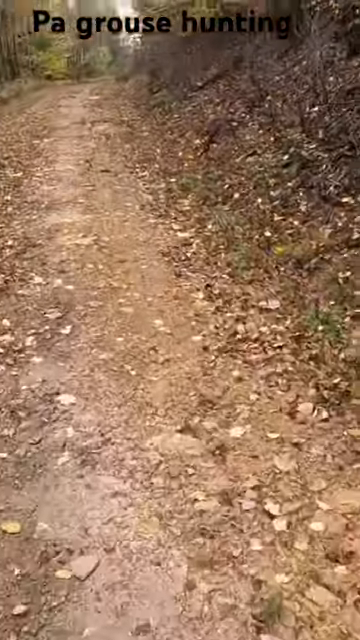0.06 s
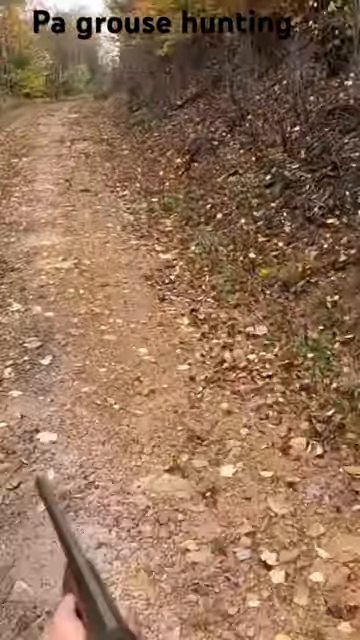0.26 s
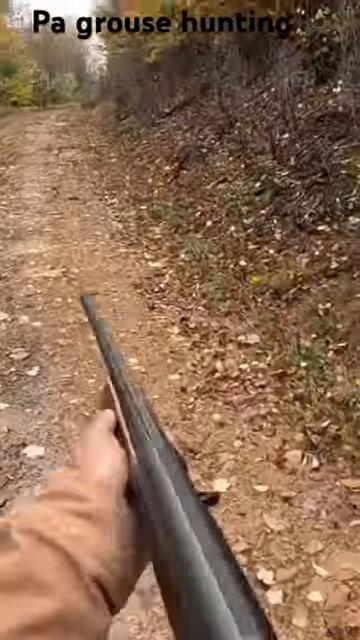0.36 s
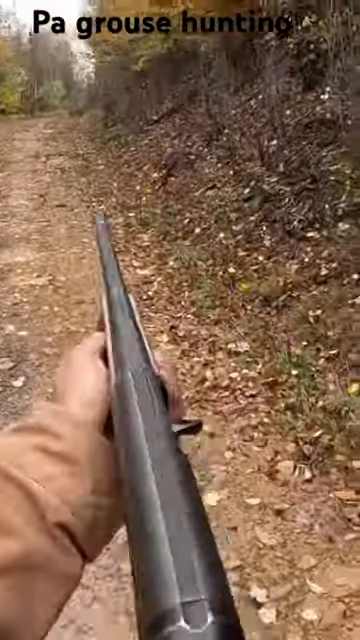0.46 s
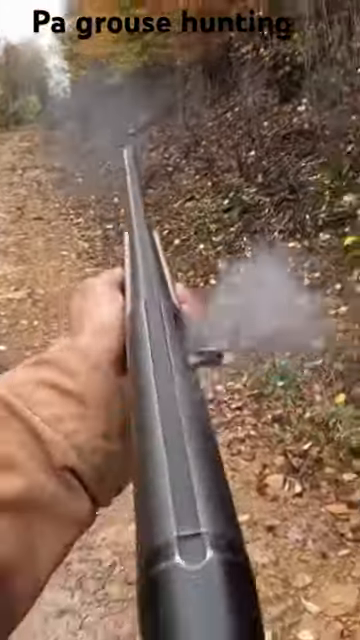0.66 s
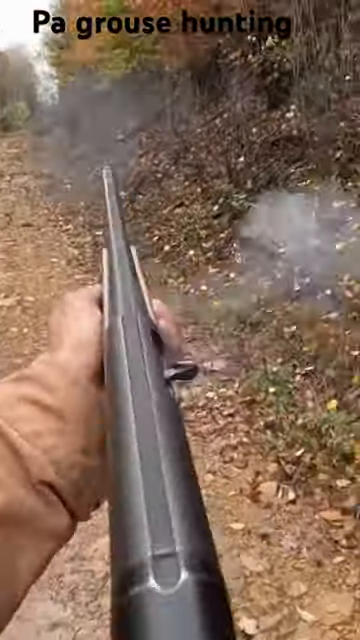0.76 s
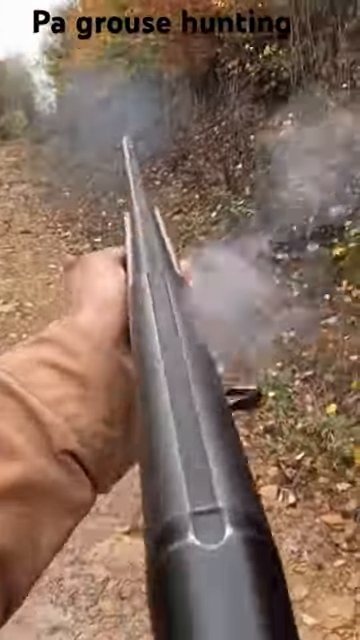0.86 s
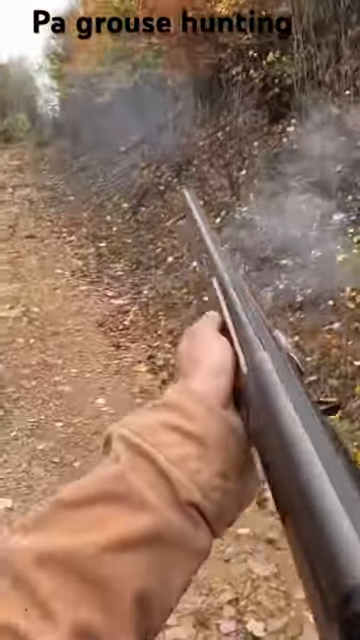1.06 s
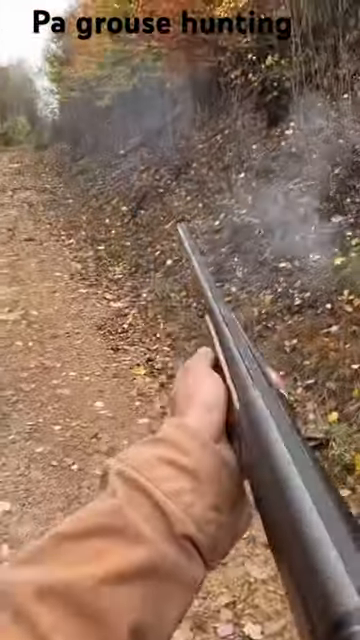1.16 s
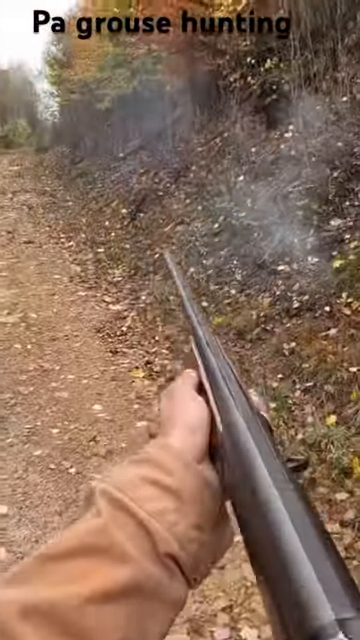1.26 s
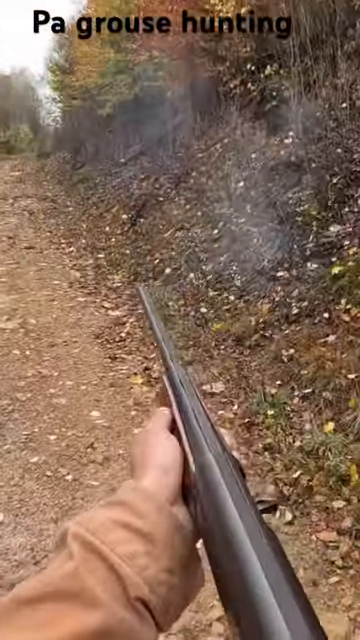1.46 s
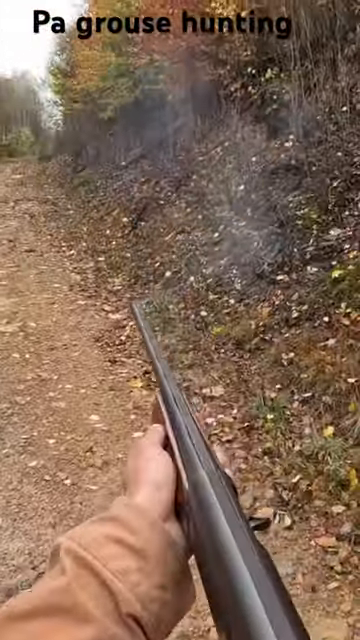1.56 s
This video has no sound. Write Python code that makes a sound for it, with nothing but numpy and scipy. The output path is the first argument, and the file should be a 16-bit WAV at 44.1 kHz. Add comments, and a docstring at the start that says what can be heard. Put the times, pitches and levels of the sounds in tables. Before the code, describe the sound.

A shotgun fires twice on a woodland track, heard from just behind the gun. First the safety clicks and a coat rustles, then each blast overloads the microphone, the bolt clacks shut, and echoes roll away through the trees.

```python
"""A woodland track: two quick shots from a self-loading shotgun, heard from just behind the gun.
The safety clicks off and a coat rustles as the gun comes up. Each blast overloads the microphone,
booms off the ground, hisses back from the leaves and rolls away through the trees;
the bolt slams shut an eighth of a second after it."""
import sys
import numpy as np
from scipy import signal
from scipy.fft import rfft, irfft
from scipy.io import wavfile

SR = 44100
rng = np.random.default_rng(int(sys.argv[2]) if len(sys.argv) > 2 else 0)


def wav_out(sig):
    """Save sig, one row per channel (or a flat mono array), as 16-bit PCM at SR to the path in sys.argv[1]."""
    wavfile.write(sys.argv[1], SR, np.round(np.clip(np.atleast_2d(sig).T, -1, 1) * 32767).astype(np.int16))


N = 70560
TIME_S = np.arange(N) / SR
BINS_HZ = np.maximum(np.arange(N // 2 + 1) * SR / N, 1)
DIFFUSE_CORRELATION = 0.84   # left-right
GROUND_DELAY_S = 0.0121


def from_db(db):
    """Decibels to gain."""
    return 10 ** (np.asarray(db) / 20)


def at_hz(points, hz, column=1):
    """One table column, interpolated over log frequency."""
    table = np.array(points)
    return np.interp(np.log(hz), np.log(table[:, 0]), table[:, column])


def level(points):
    """A dB curve as gain per sample."""
    return from_db(np.interp(TIME_S, *np.transpose(points)))


def later(x, delay_s):
    """Delay, zero-padded."""
    lag = int(np.clip(delay_s * SR, 0, N - 1))
    return np.concatenate([np.zeros_like(x[..., :lag]), x[..., :N - lag]], axis=-1)


def white(correlation):
    """Stereo white noise of given left-right correlation."""
    mid, side = rng.standard_normal((2, N))
    return np.sqrt((1 + correlation) / 2) * mid + np.sqrt((1 - correlation) / 2) * np.array([side, -side])


def noise(spectrum, correlation, tilt_db_per_oct=0, envelope=1):
    """Enveloped stereo noise through a minimum-phase filter of unit power gain."""
    gain = from_db(at_hz(spectrum, BINS_HZ) + tilt_db_per_oct * np.log2(BINS_HZ))
    cepstrum = irfft(np.log(gain / np.sqrt(np.mean(gain ** 2))), N)
    causal = np.concatenate([cepstrum[:1], 2 * cepstrum[1:N // 2]])
    response = np.exp(rfft(causal, N))
    return irfft(rfft(white(correlation) * envelope) * response, N)


def decay(t60_s, hold_s=0):
    """Envelope: holds, then falls 60 dB in t60_s."""
    return np.exp(-np.minimum(np.log(1000) * np.maximum(TIME_S - hold_s, 0) / t60_s, 40))


def ring(modes):
    """Damped sines struck at time zero."""
    return sum(from_db(db) * np.sin(2 * np.pi * hz * TIME_S) * decay(t60_s) for hz, db, t60_s in modes)


def forest():
    """Faint steady hush of the forest."""
    # (frequency [Hz], relative density [dB])
    spectrum = [(50, 0), (300, -4.5), (800, -20), (1300, -2.5), (2500, -16), (5500, -17), (9000, -35),
                (15000, -56)]
    return from_db(-57) * noise(spectrum, DIFFUSE_CORRELATION)


def buffet():
    """Air moving over the microphone rumbles."""
    # (time [s], level [dB])
    gusts = [(0, -36), (.2, -42.5), (.36, -35.5), (.47, -45.5), (.55, -26), (.62, -37.5), (.92, -34),
             (1.02, -67.5), (1.6, -66)]
    # (frequency [Hz], relative density [dB])
    spectrum = [(8, -20.5), (28, 0), (60, -13.5), (130, -20.5), (300, -31.5), (1000, -68)]
    return level(gusts) * noise(spectrum, correlation=0.75)


def coat():
    """The sleeve rubs as the gun is raised."""
    # (time [s], level [dB])
    sleeve = [(0, -45), (.06, -59), (.19, -56.5), (.245, -42.5), (.275, -38.5), (.32, -27.5), (.342, -37.5),
              (.38, -39.5), (.44, -52.5), (.5, -59.5), (.54, -27.5), (.57, -55.5)]
    # (frequency [Hz], relative density [dB])
    cloth = [(60, -0.5), (160, -8.5), (300, 4), (600, -4), (950, -5.5), (1170, 3.5), (1380, -4),
             (1900, -7.5), (2800, -13.5), (5000, -19.5), (9000, -33.5), (15000, -66)]
    return level(sleeve) * noise(cloth, correlation=0.98)


def bright_hiss():
    """Faint hiss with an insect-like peak near 8.8 kHz; swells briefly just before the first shot."""
    # (time [s], level [dB])
    swell = [(0, -58.5), (.2, -53), (.38, -53), (.47, -63.5), (.54, -35), (.6, -68), (1.6, -69.5)]
    # (frequency [Hz], relative density [dB])
    spectrum = [(500, 0), (1500, 0.5), (2500, -2), (5000, -3), (8800, -1.5), (10000, -12.5), (13000, -14.5),
                (15000, -33)]
    return level(swell) * noise(spectrum, correlation=0.37)


def action():
    """Hammer, bolt and small rattles: steel parts chatter briefly, then settle."""
    # (time [s], level [dB], t60 [s])
    clacks = [(0.0649, -36, 0.0078), (.5410, -14.5, 0.019), (0.6784, -13.5, 0.032), (.9140, -15, .028),
              (1.3626, -34.5, 0.011), (1.5648, -48.5, 0.037)]
    # (frequency [Hz], relative density [dB])
    steel = [(100, -8), (450, -6), (1100, -6), (2200, -2.5), (2900, -7.5), (4200, -5.5), (5600, -3),
             (7100, -7), (8200, -13), (11000, -20.5), (15500, -49.5)]
    out = 0
    for at_s, db, t60_s in clacks:
        clack = noise(steel, correlation=0.84, envelope=decay(t60_s, hold_s=0.0016))
        out = out + later(from_db(db) * clack, at_s)
    return out


def safety():
    """The safety slides over and snaps home; its catch rings as it seats."""
    # (time [s], level [dB], t60 [s])
    snaps = [(0.2311, -20.5, 0.011), (0.2314, -16, 0.0086), (0.2307, -29.5, 0.0071), (0.2376, -34.5, 0.078)]
    # (frequency [Hz], relative density [dB])
    spectrum = [(100, -58), (600, -25), (1000, -16), (1250, 3.5), (1420, -25), (1720, 1.5), (2050, -1.5),
                (2450, -5.5), (3000, -19), (3650, -1), (4400, -11), (5300, -6), (7500, -13), (9000, -21),
                (12000, -32), (15500, -45)]
    # (frequency [Hz], level [dB], t60 [s])
    catch_modes = [(1680, -15, 0.016), (2390, -18.5, 0.012), (3600, -16, 0.0092)]
    envelope = sum(later(from_db(db) * decay(t60_s), at_s) for at_s, db, t60_s in snaps)
    catch = signal.sosfilt(signal.butter(2, 1300, "high", fs=SR, output="sos"), ring(catch_modes))
    return noise(spectrum, correlation=0.87, envelope=envelope) + later(catch, delay_s=0.2311)


def jolts():
    """Jolts of the gun shake the microphone."""
    # (time [s], level [dB], frequency [Hz], t60 [s])
    thumps = [(.377, -26.5, 29.7, 0.26), (0.683, -17, 29.7, 0.13), (0.9171, -11, 133, 0.0264),
              (.922, -28, 29.2, .12), (1.372, -35, 350, 0.056)]
    return sum(later(ring([(hz, db, t60_s)]), at_s) for at_s, db, hz, t60_s in thumps)


def shock(length_s=0.00086):
    """N-shaped pressure front."""
    return (1 - 2 * TIME_S / length_s) * (TIME_S < length_s)


def crack(tilt_db_per_oct):
    """Shock front plus a noise burst, strongest in its first instant."""
    # (frequency [Hz], relative density [dB])
    spectrum = [(60, 0.5), (130, -4.5), (300, 1.5), (460, -6), (650, -12.5), (1250, -0.5), (2000, -8.5),
                (3200, -6), (6500, -8.5), (10000, -17.5), (16000, -38)]
    envelope = decay(t60_s=0.02, hold_s=0.0062) + from_db(-1.5) * decay(t60_s=0.011)
    burst = noise(spectrum, correlation=0.75, tilt_db_per_oct=tilt_db_per_oct, envelope=envelope)
    return burst + from_db(1) * shock()


def pressure_wave():
    """Low-pressure trough behind the front, dulled slap off the ground, low boom."""
    # (frequency [Hz], level [dB], t60 [s])
    boom_modes = [(173, -8.5, 0.057), (131, -16, 0.12), (325, -19, 0.081)]
    trough_at_s, trough_sigma_s, right_lag_s = 0.0084, 0.00052, 0.00034
    trough = -from_db(-12.5) * np.exp(-0.5 * ((TIME_S - trough_at_s) / trough_sigma_s) ** 2)
    slap = signal.sosfilt(signal.butter(2, 4500, fs=SR, output="sos"), shock() + 1e-18)
    low = trough + later(ring(boom_modes), delay_s=0.01294)
    return later(from_db(-10) * slap, GROUND_DELAY_S) + np.array([low, later(low, right_lag_s)])


def litter_spray():
    """Bright reflections from the litter at the shooter's feet."""
    # (frequency [Hz], relative density [dB])
    spectrum = [(100, -1.5), (500, -7.5), (1200, -4), (2300, -0.5), (6500, 0), (8500, -3), (12000, -22),
                (15000, -39.5)]
    spray = noise(spectrum, correlation=0.75, envelope=decay(t60_s=0.12))
    return from_db(-19.5) * later(spray, GROUND_DELAY_S)


def reflectors(spread_db):
    """Dense reflections of uneven strength, redrawn each millisecond."""
    sizes = from_db(spread_db * np.interp(TIME_S * 1000, np.arange(2000), rng.standard_normal(2000)))
    return white(DIFFUSE_CORRELATION) * sizes / np.sqrt(np.mean(sizes ** 2))


def scatter(bands, paths, rise_s):
    """Reflections split into half-octave bands, each with its own decay."""
    edges_hz = np.geomspace(28, 16000, 20)
    spectrum, colour = rfft(paths), from_db(at_hz(bands, BINS_HZ))
    out, power = 0, 0
    for low_hz, high_hz in zip(edges_hz, edges_hz[1:]):
        gain = colour * (BINS_HZ >= low_hz) * (BINS_HZ < high_hz)
        t60_s = at_hz(bands, np.sqrt(low_hz * high_hz), column=2)
        out = out + irfft(spectrum * gain, N) * decay(t60_s)
        power += np.mean(gain ** 2)
    return out / np.sqrt(power) * np.minimum(TIME_S / rise_s, 1)


def leaf_hiss(paths):
    """Early scatter from nearby leaves."""
    # (frequency [Hz], relative density [dB], t60 [s])
    bands = [(40, -1.5, 0.35), (87.4, -2, 0.75), (154, 7, .6), (271, 3, 0.68), (450, -7.5, 0.47),
             (1130, -4.5, 1), (2370, -10.5, 1), (5550, -9.5, 0.91), (7820, -13.5, 0.68),
             (12240, -24.5, 0.67), (15300, -46, 0.74)]
    return from_db(-21.5) * later(scatter(bands, paths, rise_s=0.016), delay_s=0.012)


def trunk_echoes():
    """Distinct echoes from trunks and the bank."""
    # (delay [s], level [dB], t60 [s])
    echoes = [(.043, -20, 0.037), (.095, -19.5, 0.018), (0.1187, -20, 0.05), (0.158, -20, 0.031),
              (.198, -23.5, 0.06), (0.2072, -20, .05), (.263, -27, 0.2)]
    # (frequency [Hz], relative density [dB])
    spectrum = [(40, -19.5), (130, 0), (250, 1.5), (700, 5.5), (1400, -1.5), (2500, -5), (5000, -13),
                (9000, -20.5), (15000, -52)]
    return sum(later(from_db(db) * noise(spectrum, DIFFUSE_CORRELATION, envelope=decay(t60_s)), delay_s)
               for delay_s, db, t60_s in echoes)


def woods_roll(paths):
    """Late, long scatter from the far woods, slightly left."""
    # (frequency [Hz], relative density [dB], t60 [s])
    bands = [(40, -11.5, 1.3), (145, -10.5, 2.7), (260, -5, 3.4), (915, -2.5, 2.55), (1810, -1.5, 1.9),
             (2280, -9, 1.9), (5200, -9.5, 1.07), (8300, -16.5, 0.82), (10700, -25.5, 0.66),
             (15000, -53, 0.73)]
    pan = from_db([[0.9], [-0.9]])
    return from_db(-28.5) * pan * later(scatter(bands, paths, rise_s=0.031), delay_s=0.19)


def shots():
    """Each shot: crack and pressure wave, then the same litter, leaves, trunks and woods answer."""
    # (time [s], crack gain [dB], wave gain [dB], echo gain [dB], crack tilt [dB/octave])
    blasts = [(0.5495, -10, 0, -0.2, 0.6), (0.7851, -9.5, 1.1, -0.88, -1.04)]
    shared_fraction = 0.61   # of scatter power, common to both shots
    shared_paths = np.sqrt(shared_fraction) * reflectors(spread_db=1.5)
    trunks, wave = trunk_echoes(), pressure_wave()
    out = 0
    for at_s, crack_db, wave_db, echo_db, tilt_db_per_oct in blasts:
        direct = from_db(crack_db) * crack(tilt_db_per_oct) + from_db(wave_db) * wave
        paths = shared_paths + np.sqrt(1 - shared_fraction) * reflectors(spread_db=0.5)
        far_paths = paths[:, ::-1]   # reversed: uncorrelated with the leaves
        echoes = litter_spray() + leaf_hiss(paths) + trunks + woods_roll(far_paths)
        out = out + later(direct + from_db(echo_db) * echoes, at_s)
    return out


def scene():
    """Stereo sum at the microphone."""
    return shots() + action() + safety() + jolts() + coat() + bright_hiss() + buffet() + forest()


def record(dry):
    """Microphone overload flattens the peaks; a steep low-pass cuts the top."""
    ceiling, stopband_hz = 0.99, 16100
    flattened = dry / (1 + (dry / ceiling) ** 4) ** 0.25
    return signal.sosfilt(signal.cheby2(12, 70, stopband_hz, fs=SR, output="sos"), flattened)


dry = scene()
out = record(dry)
wav_out(out)
```